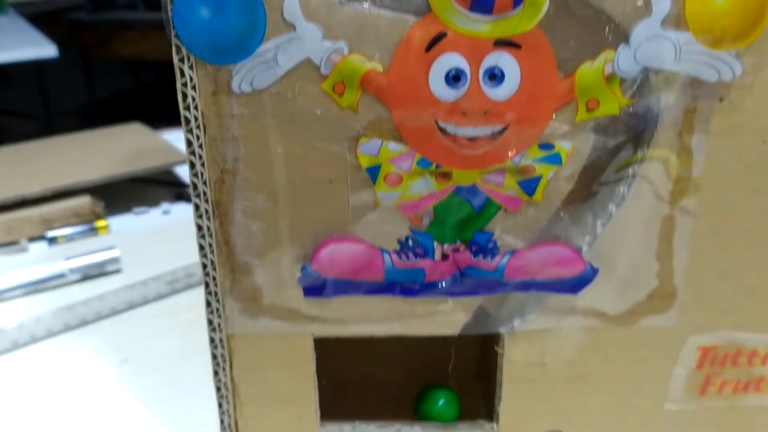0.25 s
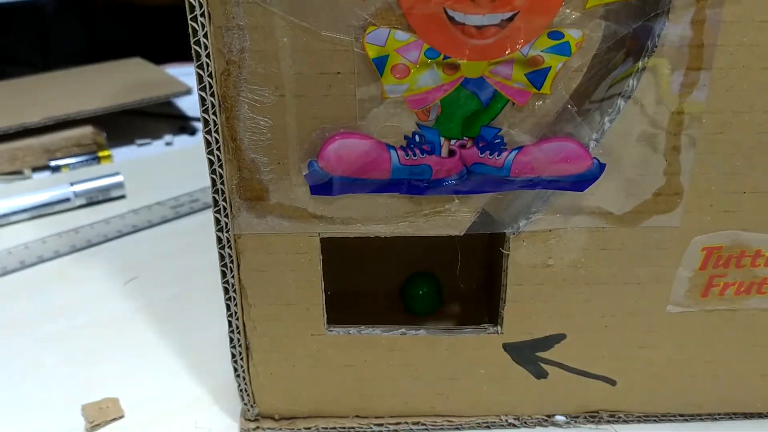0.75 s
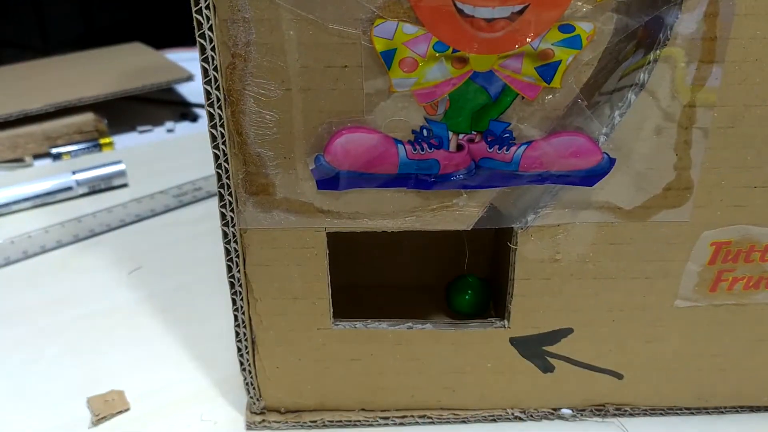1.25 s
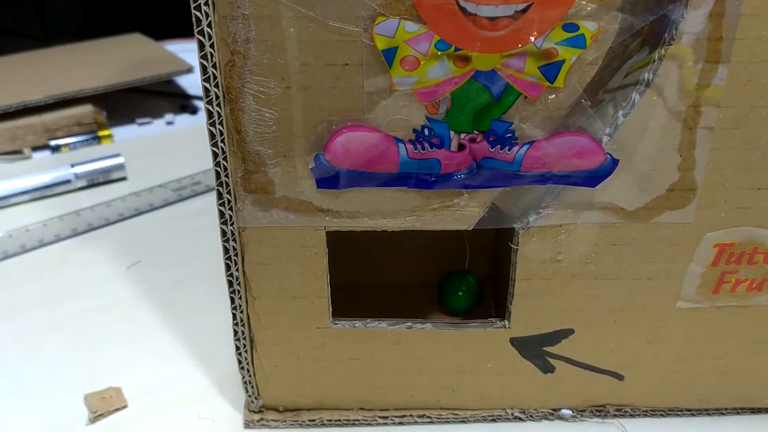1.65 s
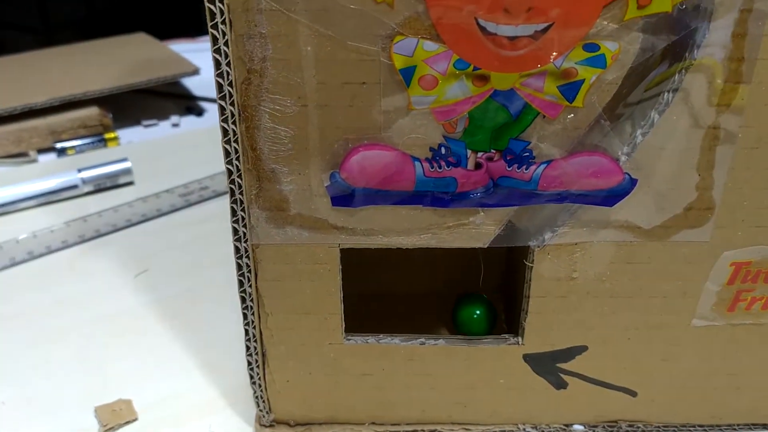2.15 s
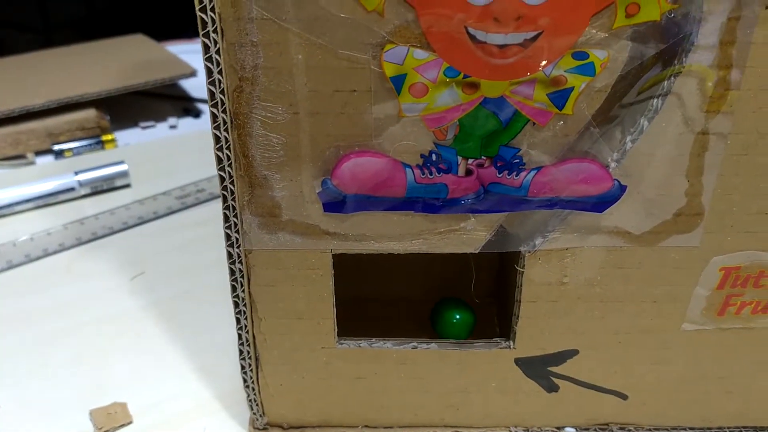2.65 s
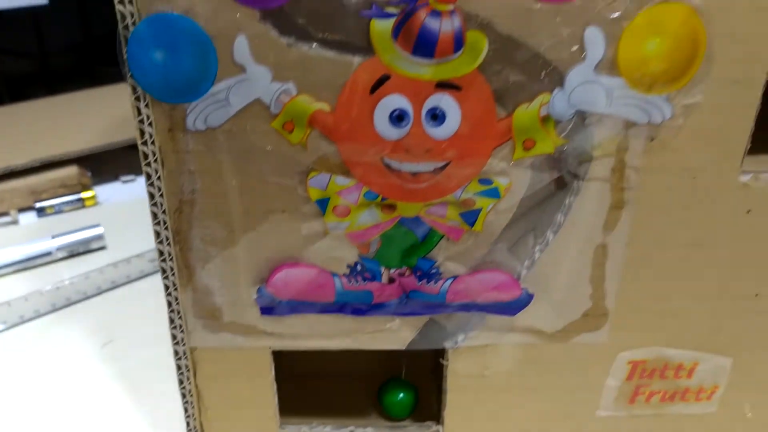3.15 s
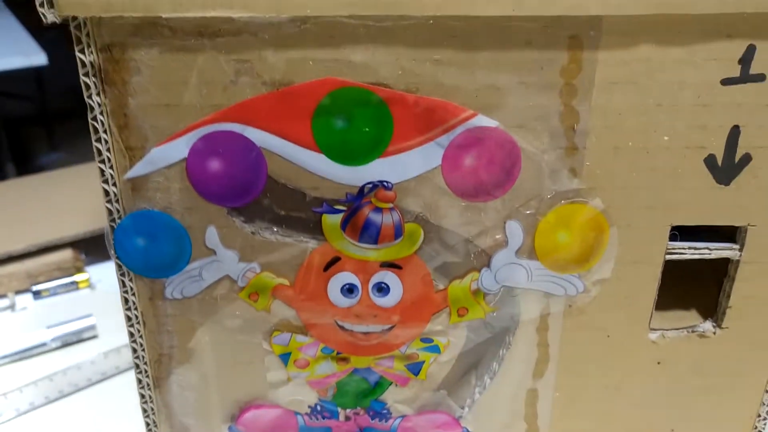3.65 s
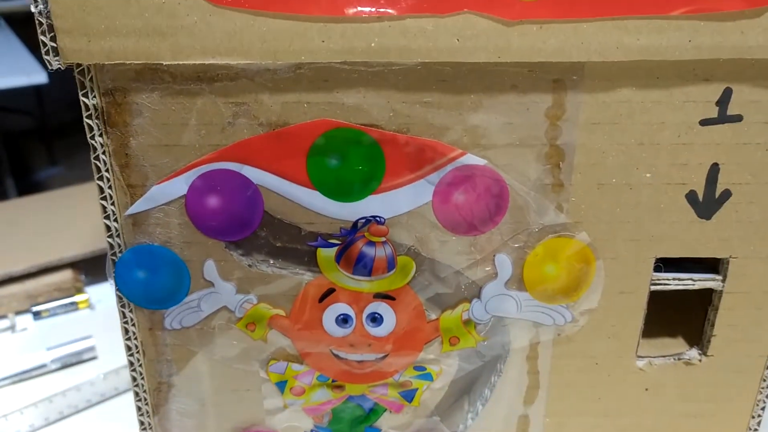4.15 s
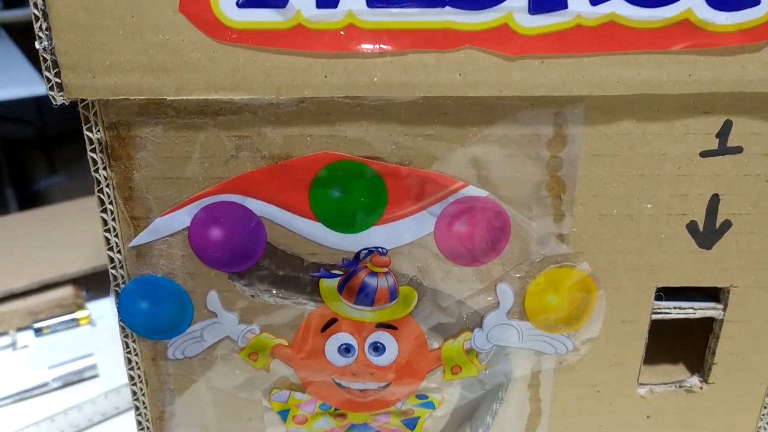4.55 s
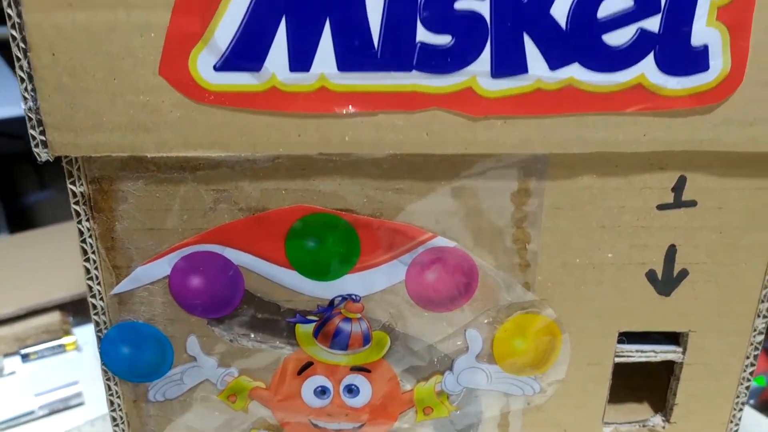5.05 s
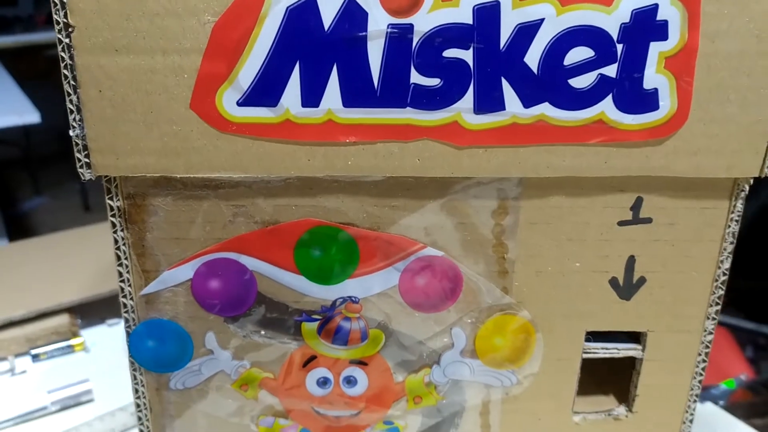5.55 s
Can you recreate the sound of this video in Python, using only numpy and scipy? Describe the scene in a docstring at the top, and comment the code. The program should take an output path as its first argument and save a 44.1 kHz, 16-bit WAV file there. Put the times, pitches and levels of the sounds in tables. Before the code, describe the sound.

In a small quiet room, heard close in stereo, a marble drops into a hollow cardboard box. Sharp knocks quicken into a patter within half a second, then it rolls with a grainy rumble, knocking a wall once more clearly. Soft hand and sleeve rustle follows, then a few coins click, scrape and ring briefly near the microphones before quiet returns.

```python
"""A marble drops into the cardboard tray of a homemade dispenser, bounces ever faster, rolls and knocks on the walls.
Then a few coins are fingered close to the microphones: they click, slide and ring briefly. A small, quiet room.
Each blow of the marble sums dying modes of the box and panel and a burst of noise; the rolling is grainy noise.
Each coin touch is a noise snap and a scrape that drives the metal's modes. Hand and sleeve are soft swells of
noise and clicks. A diffuse tail, low standing waves and a faint steady hush make the room."""
import sys
import numpy as np
from scipy import signal
from scipy.fft import rfft, irfft, next_fast_len
from scipy.io import wavfile
from scipy.ndimage import uniform_filter1d

SR = 44100
rng = np.random.default_rng(int(sys.argv[2]) if len(sys.argv) > 2 else 0)


def transcribe(u):
    """Save the signal u as a 16-bit wav file named by the first command-line argument.

    u: samples, shape (n,) or (channels, n), limited to [-1, 1]; the rate is SR.
    q: integer samples, one column per channel.
    """
    v = np.clip(np.atleast_2d(u).T, -1, 1)
    q = np.round(v * 32767).astype(np.int16)
    wavfile.write(sys.argv[1], SR, q)


N = 255327
TIME = np.arange(N) / SR  # s, the whole scene
HIT = TIME[:SR // 3]  # s, one short sound


def amp(db):
    """Decibels to gain."""
    return 10 ** (np.asarray(db) / 20)


def evened(x):
    """Scales to rms 1."""
    return x / np.sqrt(np.mean(x ** 2) + 1e-20)


def blow(x):
    """Scales a hit to rms 1 over its first fortieth of a second."""
    return x / np.sqrt(np.mean(x[..., :SR // 40] ** 2))


def read(points, hz):
    """Reads a table on a log-frequency axis."""
    f, value = np.transpose(points)
    return np.interp(np.log(hz + 1), np.log(f + 1), value)


def fade(t, t60):
    """Exponential decay, 60 dB down at t60 seconds."""
    return np.exp(-np.log(1000) * t / np.maximum(t60, 1e-3))


def add(mix, s, sound):
    """Mixes a sound in at time s."""
    start = max(round(s * SR), 0)
    part = mix[:, start:][:, :sound.shape[-1]]
    part += sound[..., :part.shape[1]]


def tilted(spectrum, bright):
    """Makes a spectrum brighter or duller by so many dB per octave."""
    return [(f, level + bright * np.log2(f)) for f, level in spectrum]


def hump(hz, steep=1):
    """A spectrum around one centre; steep narrows it."""
    octaves = np.array([-4, -2, -1, 0, 1, 3, 6])
    db = np.array([-30.5, -18.0, -11.0, -0.5, -15.5, -41.0, -90])
    return np.transpose([hz * 2. ** octaves, steep * db])


def uneven(spectrum, db, count=72):
    """Each point of contact favours its own scatter of narrow bands."""
    hz = np.linspace(500, 16000, count)
    return np.transpose([hz, read(spectrum, hz) + db * rng.standard_normal(count)])


def dulled(spectrum, edge_hz, db_per_octave=45):
    """Cuts the treble above an edge, so the noise sounds duller."""
    return [(f, level - db_per_octave * max(np.log2(f / edge_hz), 0)) for f, level in spectrum]


def colour(x, spectrum):
    """Gives two unrelated signals a spectrum and the likeness of the two microphones."""
    # how alike the microphones hear: (frequency [Hz], left-right likeness [0 to 1])
    likeness = [(50, 0.011), (150, 0.92), (600, 0.59), (1400, 0.34), (3000, 0.31), (15000, 0)]
    left, other = rfft(x)
    hz = np.fft.rfftfreq(x.shape[1], 1 / SR)
    same = np.clip(read(likeness, hz), -1, 1)
    right = same * left + np.sqrt(1 - same ** 2) * other
    return irfft(np.array([left, right]) * amp(read(spectrum, hz)), x.shape[1])


def noise(spectrum, size, grain_db=0):
    """Coloured stereo noise of rms 1; grain_db makes single grains stand out."""
    length = next_fast_len(size)
    grains = amp(grain_db * np.minimum(rng.exponential(1, length), 6))
    return evened(colour(rng.standard_normal((2, length)) * grains, spectrum)[:, :size])


def flutter(db, span, size=N):
    """Stick and slip: a gain that wanders quickly, smoothed twice over span seconds."""
    width = max(round(span * SR), 1)
    smooth = uniform_filter1d(rng.standard_normal(size), width)
    return amp(db * evened(uniform_filter1d(smooth, width)))


def swell(spectrum, s, db, half, grain_db=0):
    """Noise that rises and falls in a bell around time s; gives its start and its sound."""
    t = np.arange(-min(3 * half, s), 3 * half, 1 / SR)
    bell = np.exp(-(t / half) ** 2)
    return s + t[0], amp(db) * noise(spectrum, len(t), grain_db) * bell


def ring(hz, t60, db, phase=0):
    """A struck body: a sum of dying modes."""
    waves = np.sin(2 * np.pi * hz[:, None] * HIT + phase)
    return (amp(db)[:, None] * fade(HIT, t60[:, None]) * waves).sum(-2)


def echoed(x, delay, share):
    """Adds one echo from the cardboard, delayed in seconds and weaker."""
    late = np.pad(x, ((0, 0), (round(delay * SR), 0)))[:, :x.shape[1]]
    return x + share * late


def placed(x, side):
    """Leans each frequency towards the left or the right microphone."""
    lean = read(side, np.fft.rfftfreq(x.shape[1], 1 / SR)) / 2
    return irfft(rfft(x) * amp([lean, -lean]), x.shape[1])


def rolling(grit_hz=2400, grit_db=-50):
    """A grainy rumble over the corrugations, following the marble's speed; a slow marble loses its grit."""
    # colour of the rolling: (frequency [Hz], level [dB])
    roll_colour = [(35, -31), (62, -8.5), (90, -17), (150, 1.5), (220, 1.5), (370, -8.5), (500, -17),
                   (650, -13.5), (820, -19.5), (1100, -13), (1450, -23.5), (1750, -16), (2700, -27),
                   (4300, -27), (6000, -28.5), (15000, -48)]
    # passes to and fro across the tray: (time of greatest speed [s], level [dB])
    passes = [(0.486, -56.5), (1.27, -62), (1.881, -63), (2.239, -68.5), (2.801, -77), (3.62, -66.5),
              (4.08, -74)]
    gather_db_per_s, slow_db_per_s = 97, 75

    # the marble runs off the ramp and slows down
    run = amp(-45 - 40 * TIME)  # falls 40 dB per second
    ramp = amp(-42) * np.exp(-(TIME / 0.04) ** 2)
    level = run + ramp
    for s, db in passes:
        drop_db = np.maximum(gather_db_per_s * (s - TIME), slow_db_per_s * (TIME - s))
        level = np.hypot(level, amp(db - drop_db))
    roll = noise(roll_colour, N, grain_db=3.5)
    rumble = signal.sosfiltfilt(signal.butter(2, grit_hz, fs=SR, output="sos"), roll)
    grit = np.minimum(level / amp(grit_db), 1) * (roll - rumble)
    return level * (rumble + grit) * flutter(db=3.0, span=0.02)


def box_thud(thud_db, clack_db, spot, softness=0.47, rise_s=0.0018):
    """The whole box answers a blow a moment later, its modes weighted by the spot struck."""
    # modes of the box: (frequency [Hz], t60 [s], level struck on the front lip [dB],
    # on the floor [dB], on a side wall [dB])
    box_modes = [(111.1, 0.62, -30, -19, -32), (147.8, 0.26, -8.5, -14.5, -13.5),
                 (230.2, 0.11, -12.5, -2, -19.5), (282, 0.027, -11, 2.5, -12.5), (362.3, 0.045, 1.5, 5, -4),
                 (462, .056, -18, -8, 3.5), (626.5, 0.02, 8.5, 8, -6), (712, 0.017, -24.5, -20.5, 15.5)]
    hz, t60 = np.transpose(box_modes)[:2]
    db = np.array([np.interp(spot, [-1, 0, 1], mode[2:]) for mode in box_modes])
    db = db + 1.6 * rng.standard_normal(len(hz))  # no two blows alike
    # a soft contact misses the upper modes
    db = db + softness * (clack_db - thud_db) * np.log2(np.maximum(hz / hz[4], 1))
    flips = np.pi * np.arange(len(hz))[:, None]  # neighbouring modes swing against each other
    return ring(hz, t60, db, flips) * (1 - np.exp(-HIT / rise_s))


def card_push(delay_s=.0018):
    """The card gives way under a blow, one short deep push."""
    # modes of the push: (frequency [Hz], t60 [s], level [dB])
    push_modes = [(380, .016, 0), (620, 0.021, 0), (1150, .006, -4)]
    return np.pad(ring(*np.transpose(push_modes)), (round(delay_s * SR), 0))[:len(HIT)]


def panel_clack(clack_db, skew=0.64, hardness=0.31, rise_s=0.00064):
    """The stiff modes of the struck panel; harder blows are brighter."""
    # modes of the panel: (frequency [Hz], t60 [s], level [dB])
    panel_modes = [(1043, 0.019, 0), (1194, 0.023, -5), (1220, 0.0095, 6.5), (1555, 0.0215, -8),
                   (1792, 0.027, 0.5), (2028, 0.021, -6.5), (2290, 0.0121, -20.5), (3847, 0.012, -3),
                   (4260, 0.00997, 3), (5060, 0.011, -19.5)]
    hz, t60, db = np.transpose(panel_modes)
    octaves = np.log2(hz / hz[0])
    db = db + (hardness * clack_db + 12.0) * octaves
    # every spot rings a little differently, and reaches the two microphones out of step
    phase = np.array([-1, 1])[:, None, None] * skew * np.minimum(hz[:, None] / 1400, 1.2) ** 2
    spread = .012 + .012 * octaves  # the high modes depend most on the spot
    detuned = hz * (1 + spread * rng.standard_normal(len(hz)))
    clack = ring(detuned, t60, db, phase) * (1 - np.exp(-HIT / rise_s))
    return echoed(clack, 0.001844, 0.56)  # off the back of the tray


def contact_tick(bright, t60=0.014, rise_s=0.00014):
    """The contact itself cracks: a very short burst of noise."""
    # crack of glass on card: (frequency [Hz], level [dB])
    crack_colour = [(1200, 1), (2100, -8), (3100, -17.5), (3700, -4.5), (4350, 0.5), (5000, -2.5),
                    (5600, -10), (6100, -10), (6900, -2), (9000, -7.5), (9900, -13), (10900, -3),
                    (12000, -14.5), (13500, -18.5), (16000, -24.5)]
    shift = 1 + .045 * rng.standard_normal()  # moves the whole spectrum up or down
    crack = np.array(tilted(crack_colour, bright)) * [shift, 1]
    tick = noise(uneven(crack, 3.0), len(HIT)) * fade(HIT, t60) * (1 - np.exp(-HIT / rise_s))
    return echoed(tick, 0.0021, 0.44)  # off the back of the tray


def strike(thud_db, clack_db, tick_db, tick_bright, spot):
    """One blow of the marble: the contact cracks, the panel clacks, the whole box thuds a moment later."""
    # where the crack is heard: (frequency [Hz], left minus right [dB])
    crack_side = [(1000, -4), (2000, 0.5), (4200, -1.5), (6500, 3), (9500, -2), (13000, -2.5)]
    # the blows carry no deep bass
    low_cut = signal.butter(2, 184, "high", fs=SR, output="sos")
    thud, push = signal.sosfilt(low_cut, [box_thud(thud_db, clack_db, spot), card_push()])
    body = amp(thud_db) * blow(thud) + amp(clack_db - 4.0) * blow(push)
    clack = amp(clack_db) * blow(panel_clack(clack_db))
    tick = amp(tick_db) * blow(contact_tick(tick_bright))
    return body + placed(clack + tick, crack_side)


def marble():
    """The marble drops, bounces to rest, rolls and knocks on the walls."""
    # knocks and bounces: (time [s], thud [dB], clack [dB], tick [dB], tick brightness [dB/octave],
    # spot [-1 front lip, 0 tray floor, 1 side wall])
    hits = [(0.0553, -34.5, -37, -39.5, 1, 0.36), (.0838, -32, -39.5, -43, -4, .6),
            (.1325, -35.5, -62, -43.5, 0, 0.11), (0.192, -34, -36, -40.5, 1, 0.28),
            (0.2414, -33.5, -33, -38.5, 0.5, 0.011), (0.2776, -38, -43.5, -49.5, -2.5, -0.33),
            (.3110, -39.5, -39.5, -54, 5, -0.18), (0.338, -39.5, -42.5, -59, 9, 0.087),
            (.3600, -41, -46, -56.5, -3, -0.11), (0.3782, -39.5, -49.5, -52, -3, -0.085),
            (0.3927, -43.5, -51, -63, -3, -.26), (0.4062, -45, -53.5, -62, -4, -0.52),
            (0.416, -39.5, -53.5, -65, 4, -0.76), (.4330, -37.5, -73, -55.5, 3.5, 0.68),
            (.4860, -45, -61, -72, 2, 0.07), (.4990, -45, -59, -76, 1, 0.19),
            (1.3051, -35.5, -63, -54.5, -1, 0.7), (1.8796, -46, -57.5, -63, -1.5, -0.97),
            (1.9270, -57.5, -90.5, -73.5, 1.5, -0.39), (2.6925, -65, -78, -89, -1, -0.25),
            (3.4332, -52, -62.5, -72, -7, -0.24), (3.791, -63, -80, -92, -6, 0.6),
            (4.089, -58, -73.5, -82, 4, -.88), (4.298, -64, -88, -82, 5, 0.46)]
    out = rolling()
    for s, *hit in hits:
        add(out, s, strike(*hit))
    return out


def handling(click_t60=0.0066):
    """Soft rubbing of hand and sleeve, dull bumps of the grip and a few light clicks, all shaped noise."""
    # colour of the rubbing: (frequency [Hz], level [dB])
    rub_colour = [(350, -4), (600, -2.5), (881, -1.5), (1100, -3), (1960, -2.5), (3040, -8), (4340, -4.5),
                  (5790, -6), (11300, -5.5), (15100, -14), (16000, -6.5)]
    # strokes of hand and sleeve: (time of the middle [s], level [dB], half length [s], brightness [dB/octave])
    strokes = [(1.634, -57, 0.023, 3), (2.756, -60.5, 0.013, 1.5), (2.985, -60, 0.011, 1),
               (2.828, -55, 0.056, 10), (3.151, -71, 0.26, 0.5), (3.615, -62, 0.11, 0),
               (3.914, -55.5, 0.13, 2), (4.848, -52, 0.061, 4.5), (5.218, -65.5, 0.32, -1)]
    # the sleeve rustles all the while the arm is raised, one row:
    # (time of the middle [s], level [dB], half length [s], brightness [dB/octave])
    arm = (4.5, -63, 1.04, 2)
    # bumps and scuffs of the grip: (time of the middle [s], level [dB], half length [s], centre [Hz])
    bumps = [(0.497, -56, 0.015, 1050), (0.899, -69, 0.0073, 1210), (1.261, -59.5, .008, 256),
             (2.245, -54.5, .011, 269.1), (2.251, -68.5, 0.012, 1074), (2.299, -73, 0.013, 1860),
             (2.781, -60, 0.026, 81.6), (2.848, -69, 0.0063, 1050), (2.871, -65.5, 0.013, 214),
             (2.964, -71.5, 0.027, 1450), (3.07, -69, 0.093, 122), (3.603, -67, 0.027, 335),
             (3.793, -60.5, 0.013, 300), (3.867, -60, 0.027, 67), (3.93, -63, 0.016, 258),
             (4.078, -55, 0.02, 170), (4.295, -62.5, 0.023, 255), (5.101, -68.5, 0.2, 109)]
    # small clicks: (time [s], level [dB], centre [Hz], narrowness [factor])
    clicks = [(.456, -51, 10900, 1.2), (.467, -50, 5000, 0.45), (0.587, -51, 2920, 1.3),
              (1.5077, -46.5, 5600, 0.32), (2.3344, -54, 2400, 1.2), (2.7185, -59, 7000, 1.1),
              (2.858, -47, 10000, 1.7), (2.987, -58, 4960, .5), (3.392, -55.5, 3960, 0.45),
              (3.669, -47.5, 11100, 1.7)]

    out = np.zeros((2, N))
    for s, db, half, bright in strokes + [arm]:
        add(out, *swell(tilted(rub_colour, bright), s, db, half, grain_db=2.5))
    out *= flutter(db=1.0, span=0.0043)
    for s, db, half, hz in bumps:
        add(out, *swell(hump(hz), s, db, half))
    for s, db, hz, steep in clicks:
        add(out, s, amp(db) * noise(hump(hz, steep), len(HIT)) * fade(HIT, click_t60))
    return out * amp([[.4], [-.4]])  # a touch louder in the left microphone


def coins(grain_db=1.5, rise_share=0.02, snap_bright=-0.3, snap_follows=0.75, snap_t60=.003):
    """Each touch is a crisp snap, echoed by the box front, and a chattering scrape that makes the metal ring."""
    # coins touching and sliding: (time [s], snap [dB], scrape [dB], t60 of the scrape [s],
    # brightness [dB/octave], upper edge [Hz])
    touches = [(3.956, -49, -37.5, .05, 4, 14000), (3.9598, -40.5, -35, 0.016, 2.5, 15000),
               (3.975, -64, -45, .055, 6, 12000), (3.9918, -47, -31.5, 0.053, 3, 14000),
               (4.001, -64, -48, 0.23, 3, 15000), (4.018, -56, -43.5, 0.063, -4, 14000),
               (4.0937, -54, -45, .026, -1, 9900), (4.101, -61, -49.5, 0.19, -3.5, 9900),
               (4.122, -60, -49.5, .16, -4, 11000), (4.140, -59, -43, .13, -0.5, 14000),
               (4.191, -58, -50, 0.06, -1.5, 11400), (4.208, -63, -46.5, 0.043, 4, 12500),
               (4.2216, -50.5, -38, 0.022, 5.5, 12800), (4.3028, -55, -36, 0.018, 0, 13900),
               (4.317, -62.5, -46, 0.068, -1.5, 9500), (4.3595, -57, -48, 0.042, 3, 10000),
               (4.3775, -58, -43, 0.047, 3, 9700), (4.386, -70, -57, 0.72, 0, 11100),
               (4.4612, -54, -51.5, 0.053, -1.5, 8900), (4.468, -62, -53, 0.16, -4.5, 11000),
               (4.5337, -59.5, -50, 0.013, -3, 7960), (4.543, -67, -64, 0.028, -5, 9000),
               (4.5617, -57.5, -43, 0.017, 2, 7900), (4.576, -61, -47, 0.13, -2, 13000),
               (4.583, -46.5, -37.5, 0.11, 13, 15000), (4.796, -51, -42, .018, 6.5, 15000),
               (4.8164, -47, -36, 0.035, 12, 16000), (4.8241, -49.5, -41, 0.05, -3, 15000),
               (4.8296, -49.5, -42.5, 0.2, 3.5, 16000)]
    # modes of the coins: (frequency [Hz], t60 [s], level [dB])
    coin_modes = [(5100, .18, 8), (5700, 0.42, -2), (6250, .15, 3), (7000, .21, 7), (8500, .2, 3),
                  (9600, 0.36, 12), (9630, 0.23, 5), (9600, 0.33, 0), (10000, 0.26, 5), (11000, .18, -1),
                  (11110, .2, -1)]
    # colour of the scrape: (frequency [Hz], level [dB])
    scrape_colour = [(590, -26), (1100, -42), (1550, -9), (2100, -8.5), (3000, -13), (3650, -1.5),
                     (4300, 1.5), (5100, -1), (5800, 7), (7100, 3), (8800, 1.5), (9600, 6), (10700, 4.5),
                     (12200, -0.5), (14000, -6.5), (16000, -4)]
    # where the coins are heard: (frequency [Hz], left minus right [dB])
    coin_side = [(1000, -4.5), (2500, -3), (4500, -0.5), (9500, 2.5), (13000, 3)]

    def touch_colour(bright, edge_hz):
        """The same edges sound brighter or duller with each touch."""
        return dulled(uneven(tilted(scrape_colour, bright), 3.0), edge_hz)

    out = np.zeros((2, N))
    hz, t60, mode_db = np.transpose(coin_modes)
    for s, snap_db, db, scrape_t60, bright, edge_hz in touches:
        attack = 1 - np.exp(-HIT / (rise_share * scrape_t60))
        chatter = evened(flutter(db=-1.0, span=0.002, size=len(HIT)))  # the milled rims catch and slip
        scrape = noise(touch_colour(bright, edge_hz), len(HIT), grain_db)
        scrape = scrape * chatter * fade(HIT, scrape_t60) * attack

        modes = ring(hz * (1 + .015 * rng.standard_normal(len(hz))), t60, mode_db)
        # the grit drives the modes
        metal = blow(signal.fftconvolve(scrape, modes[None], axes=1)[:, :len(HIT)])
        # a bright touch rings more than a dull one
        ring_db = -25 + 0.28 * bright

        # the edges meet
        snap = noise(touch_colour(snap_bright + snap_follows * bright, edge_hz), len(HIT))
        snap = blow(echoed(snap * fade(HIT, snap_t60), .0015, 0.58))
        add(out, s, amp(snap_db) * snap + amp(db) * (scrape + amp(ring_db) * metal))
    return placed(out, coin_side)


def room(x, gap_s=0.0029):
    """A diffuse tail of decaying noise, each band dying at its own speed."""
    # the room's tail: (frequency [Hz], t60 [s], level [dB])
    tail_bands = [(100, 0.97, -15), (173.85, 1, -5), (420, 0.9, -15), (1115.7, 0.81, -14.5),
                  (1970, 0.75, -8), (3830, 0.93, -18), (8300, 0.79, -11.5), (16920, 0.414, -55)]
    table = np.array(tail_bands)
    white = colour(rng.standard_normal((2, SR)), [(1, 0), (SR, 0)])
    hz, t, bands = signal.stft(white, SR, nperseg=512)
    t60 = read(table[:, [0, 1]], hz)[:, None]
    level = amp(read(table[:, [0, 2]], hz))[:, None]
    unit = np.sqrt(2 * np.log(1000) / (t60 * SR))  # equal energy whatever the decay time
    tail = signal.istft(bands * level * unit * fade(t, t60), SR, nperseg=512)[1][:, :SR]
    tail *= 1 - np.exp(-(TIME[:SR] / gap_s) ** 2)  # the tail builds up just after the direct sound
    return signal.fftconvolve(x, tail, axes=1)[:, :N]


def standing(x):
    """The room's low standing waves hum on after each knock, alike at both microphones."""
    # standing waves: (frequency [Hz], t60 [s], gain [dB])
    room_modes = [(118, 0.89, -4.5), (147.2, 0.9, -9), (220.8, 0.754, -3), (366, 0.51, -8.5)]
    hz, t60, db = np.transpose(room_modes)[:, :, None]
    t = TIME[:SR]
    unit = 2 * np.log(1000) / (t60 * SR)  # makes the gain independent of the decay time
    waves = amp(db) * unit * fade(t, t60) * np.sin(2 * np.pi * hz * t)
    return signal.fftconvolve(x, waves.sum(0)[None], axes=1)[:, :N]


def hush():
    """The quiet room at rest: faint, steady coloured noise."""
    # colour of the hush: (frequency [Hz], level [dB])
    hush_colour = [(15, -28.5), (25, -27), (40, -6), (59, 4.5), (134, -4.5), (373, -8.5), (591, -17),
                   (1190, -19), (1400, -22.5), (3620, -22), (6380, -21.5), (8140, -19), (14400, -26),
                   (16000, -20.5)]
    return amp(-68.5) * noise(hush_colour, N)


def scene(marble_wet_db=-2, coins_wet_db=-1):
    """Marble, coins and hands in the quiet room."""
    box, hands, metal = marble(), handling(), coins()
    sent = amp(marble_wet_db) * box + amp(coins_wet_db) * metal + hands
    tail = room(sent) + standing(box)
    return box + metal + hands + tail + hush()


def record(dry):
    """The recorder's band limit, a steep low-pass at 15.8 kHz."""
    low_pass = signal.firwin(401, 15800, window=("kaiser", 8), fs=SR)
    return signal.oaconvolve(dry, low_pass[None], "same")


dry = scene()
out = record(dry)
transcribe(out)
```